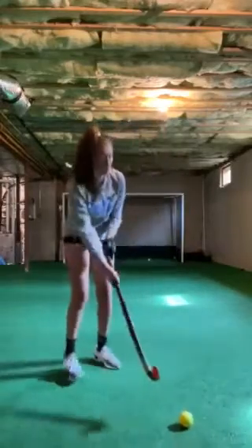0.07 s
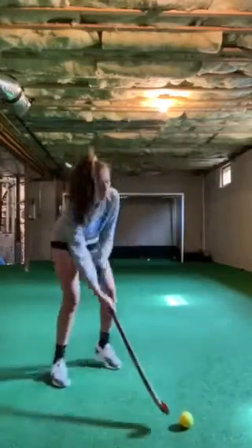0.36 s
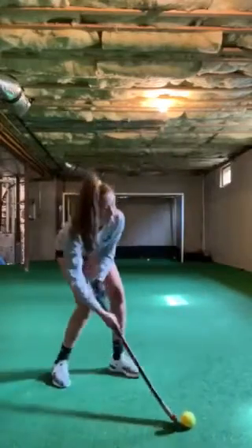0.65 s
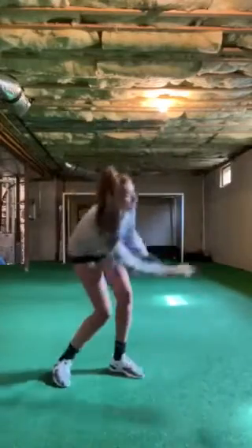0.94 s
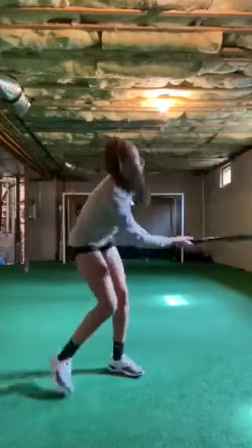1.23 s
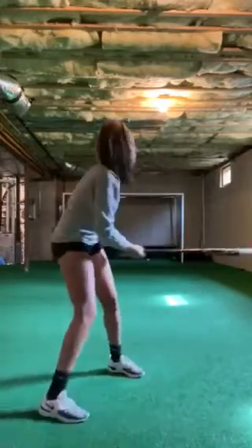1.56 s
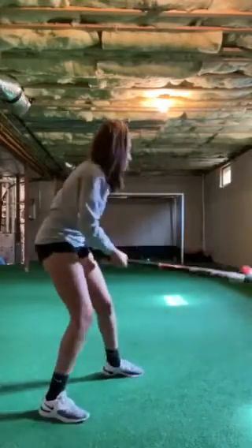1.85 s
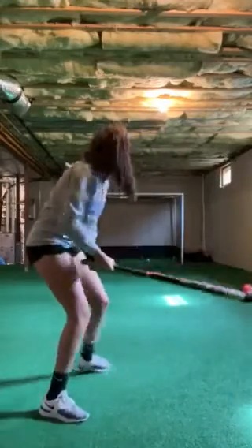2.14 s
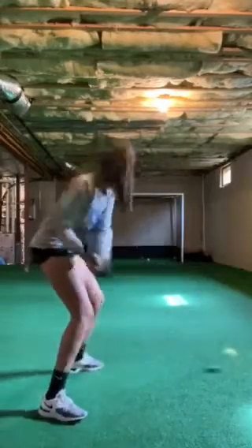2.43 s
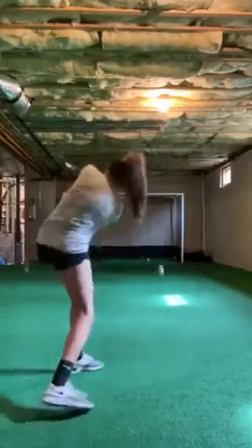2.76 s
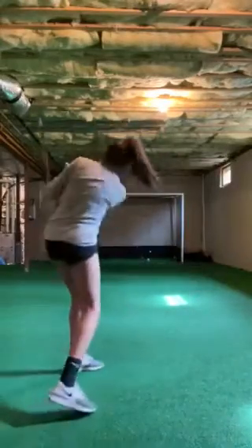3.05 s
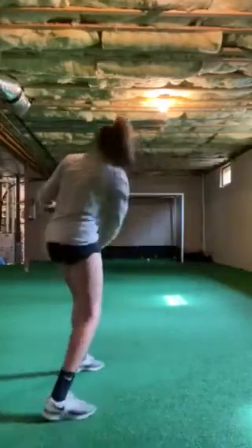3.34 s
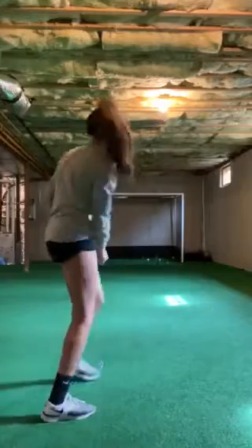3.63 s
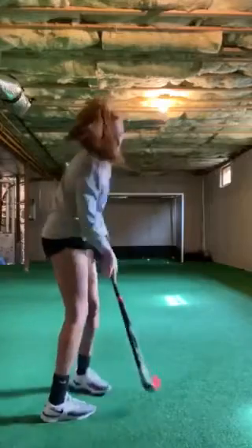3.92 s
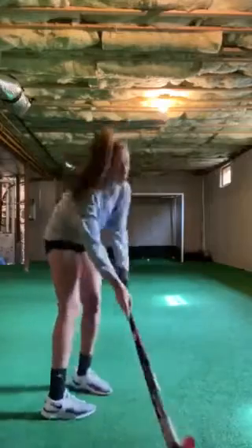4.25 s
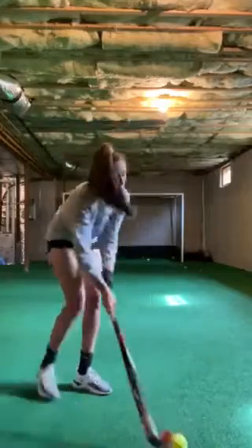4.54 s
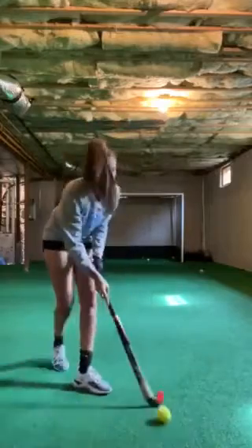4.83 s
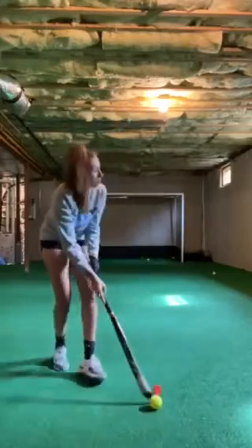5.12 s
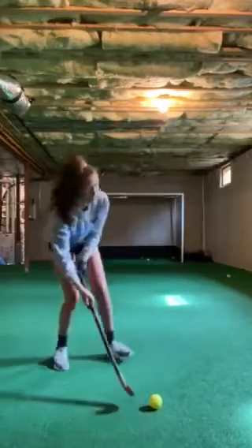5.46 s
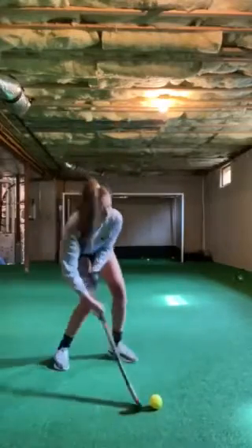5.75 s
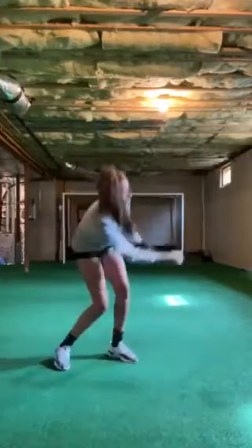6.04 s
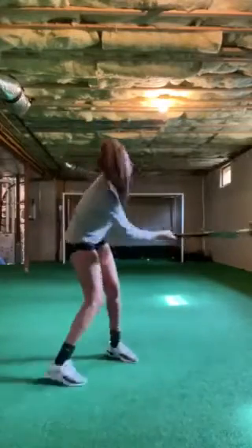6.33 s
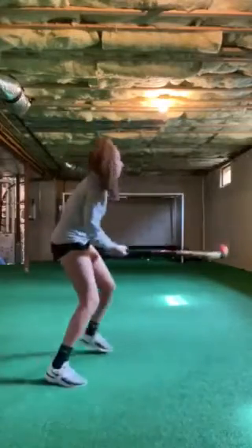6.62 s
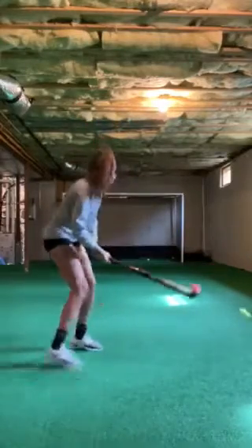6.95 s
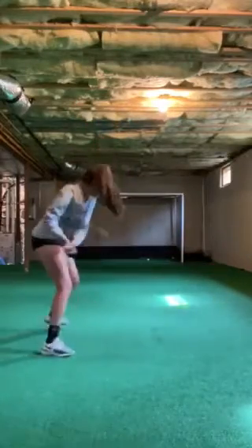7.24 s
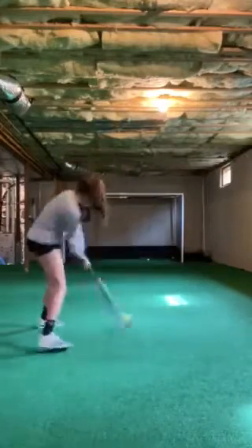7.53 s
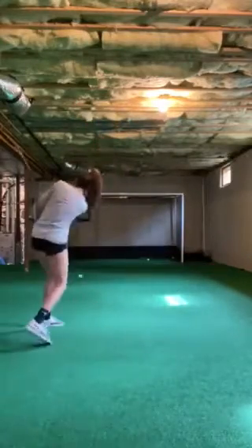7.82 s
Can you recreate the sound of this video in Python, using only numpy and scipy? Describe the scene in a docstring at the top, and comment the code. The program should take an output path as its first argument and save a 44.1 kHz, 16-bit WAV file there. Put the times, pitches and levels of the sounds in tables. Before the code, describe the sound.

Light knocks of a stick on a ball and dull bounces on turf are followed by a hard crack and, a moment later, a hollow boom from a backboard. Four more taps, two soft bounces and another sharp shot follow. Each knock flutters between the walls of a low basement, heard from near the player, over faint shuffling and a steady low building rumble.

```python
"""A soft shuffle and a light tap of stick on ball open field hockey practice in a long, low basement.
Twice the player nudges the ball, knocks it up, lets it thud on the artificial turf and drives it away
with a crack; the first shot booms on the goal's backboard. Every knock flutters between the end walls,
over faint scuffs, rustling clothes and a low rumble. A limiter turns the sound down after the loudest
blows and lets it creep back."""
import sys
import numpy as np
from scipy import signal
from scipy.fft import rfft, irfft, next_fast_len
from scipy.io import wavfile
from scipy.ndimage import uniform_filter1d, minimum_filter1d

SR = 44100
rng = np.random.default_rng(int(sys.argv[2]) if len(sys.argv) > 2 else 0)


def unload_audio(sound):
    """Save the sound as a 16-bit wav file, at the path given as the first command line argument."""
    columns = np.transpose(np.atleast_2d(sound))
    # keep every value between -1 and 1, then stretch to whole-number steps
    steps = np.round(np.clip(columns, -1, 1) * 32767)
    wavfile.write(sys.argv[1], SR, steps.astype(np.int16))


N = 347508
SIZE = 3 * 2 ** 14  # samples in one knock or one room response
AGE, TIME = np.arange(SIZE) / SR, np.arange(N) / SR  # seconds into a knock, and into the scene
FADE = np.minimum((AGE[-1] - AGE) / .2, 1)  # fades out a knock's last 0.2 s

# Below, tilt brightens a sound, pan is left minus right, and a fade time is the time to drop 60 dB.
# Full shots: (time [s], level [dB], tilt [dB/octave], stick ring [dB], ball ring [dB], shaft [dB],
# echo [dB], flutter [dB], room [dB], knock pitch [Hz], its boost [dB], echo delay [s], pan [dB],
# noise burst [s])
SHOT_HITS = [(2.5510, 6.5, -.55, -12, -2, -21, -13, -20.5, -2.6, 1290, 3, .059, 6.5, .009),
             (7.4792, -5.3, .1, -9, -17, -5.5, -6.5, -16.5, 3.8, 1940, 4, .048, 2.5, .005)]
# The ball hitting the backboard: (time [s], level [dB], room [dB], echo delay [s], pan [dB])
GOAL_HIT = (3.1372, -4.6, 2.2, .069, 1.5)
# Light blows: (time [s], level [dB], tilt [dB/octave], stick ring [dB], pan [dB], room [dB], echo [dB],
# noise burst [s], low knock [Hz], its boost [dB], high knock [Hz], its boost [dB])
TAP_HITS = [(0.6420, -40, -1.5, -15, 3, 1.5, -9, .003, 850, 4, 1230, 2),
            (4.3312, -30.5, -.6, 2, 5, -1, -6, .003, 1325, 3, 2650, 3),
            (4.8820, -33, -1.1, -12, 3.5, 1, -7, .003, 1030, 3, 1380, 4),
            (5.7315, -32.3, .7, -11, 1.5, 2.5, -13, .005, 1000, 7, 1980, 7)]  # on the resting ball
LIFT_HITS = [(1.3060, -26.5, -.55, -18, 2, 2.2, -8, 0, 1130, 4, 1600, 3),
             (6.2863, -27.6, .3, -18, 2, 2.2, -5.5, 0, 1200, 4, 1720, 4)]  # under the ball in the air
# Ball or stick landing on the turf: (time [s], level [dB], tilt [dB/octave], treble cutoff [Hz])
LANDINGS = [(0.493, -56, 0, 1500), (1.7716, -34, .5, 9000), (2.2925, -42, -1.5, 1400),
            (6.7970, -41.5, .7, 9000), (7.2985, -47, -1.5, 1400)]
# The player's movements: (middle time [s], half length [s], level [dB])
SCUFF_MOVES = [(1.07, .05, -75), (1.63, .08, -67), (1.95, .04, -70), (2.10, .06, -59), (2.33, .09, -72),
               (3.85, .03, -77), (4.16, .13, -75), (4.76, .07, -71), (5.02, .1, -72), (5.41, .04, -76),
               (6.06, .04, -76), (6.965, .04, -60.5), (7.17, .05, -75)]  # shoes scuffing, sleeves brushing
SHUFFLE_MOVES = [(0.30, .25, -66), (4.21, .13, -60.5)]  # soft, dull shuffling while lining up

# How much bass and treble each sound has: (frequency [Hz], level [dB])
SHOT_TONE = [(40, -11), (120, -10), (230, -15), (380, -12), (650, -12.5), (900, -11), (1250, -2),
             (2000, -2), (2700, -5), (3400, -4.5), (4300, -10), (5400, -8.5), (7000, -11.5), (8500, -18),
             (10500, -31), (12500, -25), (16000, -52)]
BOARD_TONE = [(30, 1), (60, -8), (120, -9), (190, 2), (400, 1.5), (680, 0), (1000, -5.5), (1400, -12),
              (2300, -9.5), (4000, -15), (7000, -21.5), (10500, -41), (13000, -42), (16000, -60)]
TAP_TONE = [(60, -32), (200, -19), (420, -7), (650, -4), (950, 0), (1700, -7), (2700, -12), (5000, -21),
            (6800, -27), (8300, -23), (10500, -40), (13000, -34), (16000, -48)]
LIFT_TONE = [(60, -30), (200, -13), (450, -11), (750, -5), (1000, -1), (1550, -1.5), (2150, -15),
             (2800, -11), (3600, -12), (8300, -13), (10500, -31), (12500, -26), (16000, -50)]
BOUNCE_TONE = [(40, -19), (130, -2), (220, -1), (480, 1.5), (750, -6), (1200, -11), (2100, -19),
               (3300, -29), (4400, -29), (8000, -43), (16000, -54)]
ECHO_TONE = [(50, -18), (110, -4), (200, 1), (400, -1), (800, -1), (2000, -1.5), (5000, -3.5),
             (13000, -4.5)]  # the room's sound against the direct sound
RUMBLE_TONE = [(25, -28), (40, -13), (60, -3), (105, 0), (145, -9), (236, -5), (384, -18), (650, -26),
               (1000, -28.5), (1440, -31), (2760, -43), (4500, -50), (7500, -55), (10400, -66),
               (13200, -61), (16000, -72)]
# The notes (modes) each object rings at when struck: (pitch [Hz], level [dB], fade time [s])
STICK_MODES = [(415, -19, .06), (490, -17, .04), (815, -9, .07), (975, -16, .045), (1320, 0, .05),
               (1820, -16, .035), (1935, -8, .05), (2100, -18, .04), (2400, -19, .03), (2660, -13, .035),
               (3320, -17, .03), (5430, -27, .015)]
SHAFT_MODES = [(150, -10, .06), (395, 0, .06), (625, -1, .05), (970, 0, .05)]
BALL_MODES = [(3350, -6, .012), (4950, -6, .012), (5430, 0, .014), (6000, -3, .008), (7010, -2, .009)]
BOARD_MODES = [(45, -11, .07), (175, -12, .09), (195, -3, .09), (223, 0, .08), (275, -3.5, .06),
               (411, -6, .07), (490, -11, .06), (628, -10, .09), (678, -43, 1.7), (2320, -41, .45),
               (2490, -38, .55), (3520, -44, .7)]
# How long sound lingers in the room: (frequency [Hz], fade time [s])
ROOM_FADES = [(100, .58), (250, .62), (600, .75), (1400, .92), (3000, .91), (6000, .67), (13000, .44)]


def shots():
    """Hard blows: the stick rings, the shaft thwacks, the ball snaps; brief noise thickens each crack."""
    out = np.zeros((2, N))
    for (s, db, tilt_db, stick_db, ball_db, shaft_db, echo_db, flutter_db, room_db,
         knock_hz, knock_db, echo_s, pan_db, burst_s) in SHOT_HITS:
        knocks = [(1940, 3), (knock_hz, knock_db)]
        crack = click(SHOT_TONE, tilt_db, knocks) + amp(stick_db) * ring(STICK_MODES, tilt_db, knocks)
        place = dict(echo_s=echo_s, pan_db=pan_db, burst_s=burst_s)
        walls = dict(echo_db=echo_db, echo_hz=7000, slap_s=.009,
                     flutter_db=flutter_db, flutter_hz=3000, loss_db=-2.8)
        add(out, s, basement(amp(db) * crack, room_db, near_db=0, near_s=.011, **place, **walls))
        add(out, s, basement(amp(db + shaft_db) * ring(SHAFT_MODES), room_db=-10, **place))
        add(out, s, basement(amp(db + ball_db) * ring(BALL_MODES), room_db=-18, near_db=-9, **place))
    return out


def goal():
    """The ball slams into the backboard, which rattles and booms while the frame rings on faintly."""
    out = np.zeros((2, N))
    s, db, room_db, echo_s, pan_db = GOAL_HIT
    walls = dict(echo_s=echo_s, pan_db=pan_db, echo_db=-11, slap_s=.02,
                 flutter_db=-17, loss_db=-9, trip_s=.076)
    slam = amp(db) * click(BOARD_TONE)
    add(out, s, basement(slam, room_db, burst_s=.005, near_s=.022, **walls))
    boom = amp(db + 2.5) * ring(BOARD_MODES)
    add(out, s, basement(boom, room_db=3, near_db=-7, **walls))
    return out


def stick_taps(hits, tone, echo_s):
    """Light blows: the blade knocks at two pitches set by the spot struck; the stick rings briefly."""
    out = np.zeros((2, N))
    for (s, db, tilt_db, ring_db, pan_db, room_db, echo_db, burst_s,
         low_hz, low_db, high_hz, high_db) in hits:
        knocks = [(low_hz, low_db), (high_hz, high_db)]
        knock = click(tone, tilt_db, knocks) + amp(ring_db) * ring(STICK_MODES, tilt_db, knocks)
        walls = dict(echo_db=echo_db, flutter_db=echo_db - 6.5, flutter_s=.011, flutter_hz=2000)
        add(out, s, basement(amp(db) * knock, room_db, echo_s, pan_db, burst_s, **walls))
    return out


def bounces():
    """The turf cushions each landing to a dull thud."""
    out = np.zeros((2, N))
    for s, db, tilt_db, cutoff_hz in LANDINGS:
        cushion = signal.butter(4, cutoff_hz, fs=SR, output="sos")
        thud = amp(db) * signal.sosfilt(cushion, click(BOUNCE_TONE, tilt_db))
        add(out, s, basement(thud, room_db=-1, echo_s=.058, pan_db=1.5,
                             near_db=2, near_s=.018, echo_db=-14, flutter_db=-19))
    return out


def click(tone, tilt_db=0, knocks=(), size=4096, spread_s=.0008, ripple_db=1.8, ripple_hz=110):
    """The pulse of one contact: a harder touch is brighter, and each spot has its own small peaks."""
    hz = np.fft.rfftfreq(size, 1 / SR)
    ripple = np.interp(hz / ripple_hz, np.arange(size), rng.standard_normal(size))
    db = read(tone, hz) + ripple_db * ripple * np.minimum(hz / 800, 1)
    db += tilt_db * np.log2(np.maximum(hz, 100)) + spot_boost(hz, knocks)
    # pack the energy at the start of the pulse, keeping its tone (minimum phase)
    cepstrum = irfft(np.log(amp(db)))
    cepstrum[1:size // 2] *= 2
    cepstrum[size // 2 + 1:] = 0
    # bending waves carry the treble first: 1 kHz comes spread_s late
    bending = 4j * np.pi * spread_s * np.sqrt(1000 * hz)
    pulse = irfft(np.exp(rfft(cepstrum) - bending))
    window = np.minimum(np.arange(size) / 10, 1) * np.linspace(1, 0, size)
    return np.pad(normalize(pulse * window), (0, SIZE - size))


def ring(modes, tilt_db=0, knocks=()):
    """One blow starts several fading notes; neighbours swing in opposite directions."""
    out = 0
    for k, (hz, db, fade_s) in enumerate(modes):
        strength = amp(db + tilt_db * np.log2(hz) + spot_boost(hz, knocks))
        envelope = strength * amp(-60 * AGE / fade_s)
        out += (-1) ** k * envelope * np.sin(2 * np.pi * hz * AGE)
    return normalize(out * FADE)


def spot_boost(hz, knocks, width_octaves=.15):
    """The struck spot of the blade favours some pitches, given as knocks: (pitch [Hz], boost [dB])."""
    hz = np.maximum(hz, 1)
    return sum(db * np.exp(-(np.log2(hz / pitch) / width_octaves) ** 2) for pitch, db in knocks)


def direct_sound(burst_s, lag_s=.00008, size=1024):
    """A blow, heard first on the left and thickened by a short burst of noise."""
    gate = np.clip((burst_s - AGE[:size]) * SR, 0, 1)
    burst = irfft(stereo_spectrum(size, 2500)[1]) * gate
    blow = burst * amp(8) / np.sqrt(1 + burst_s * SR)
    blow[0, 0] += 1
    blow[1, int(lag_s * SR)] += 1
    blow /= np.linalg.norm(blow, axis=1, keepdims=True)
    return np.pad(blow, ((0, 0), (0, SIZE - size)))


def basement(knock, room_db, echo_s, pan_db, burst_s=0, near_db=-2, near_s=.012,
             echo_db=-8, echo_hz=5000, slap_s=.013,
             flutter_db=-14.5, flutter_hz=2400, flutter_s=.013, loss_db=-5.5, trip_s=.0745):
    """A knock arrives directly, then off floor and beams, then back and forth between the end walls."""
    hz, spectrum = stereo_spectrum(SIZE)
    direct = direct_sound(burst_s)
    nearby = amp(near_db) * irfft(stereo_spectrum(SIZE, 800)[1]) * scatter(.002, near_s, .001)
    slap = amp(echo_db) * scatter(echo_s, slap_s, .0005) * irfft(spectrum / np.hypot(1, hz / echo_hz))
    # the cluttered end walls dull the flutter and leave each round trip weaker and more smeared
    trips = 0
    for k in range(1, 5):
        smear = scatter(echo_s + k * trip_s, k * flutter_s, k ** 2 * .0008)
        trips += amp(flutter_db + (k - 1) * loss_db) * smear
    flutter = trips * irfft(spectrum / np.hypot(1, hz / flutter_hz))
    far = amp(-5.9) * room_tail() + slap + flutter
    far = irfft(rfft(far * FADE) * amp(room_db + read(ECHO_TONE, hz)))
    response = (direct + nearby) * pan(pan_db) + far * FADE
    return signal.fftconvolve(knock[None], response, axes=1)


def scatter(delay_s, decay_s, rise_s):
    """The rise and fall of a bunch of reflections that starts after a delay."""
    age = np.maximum(AGE - delay_s, 0)
    shape = np.exp(-age / decay_s) * (1 - np.exp(-age / rise_s))
    return shape / np.linalg.norm(shape)


def room_tail(build_s=.03):
    """Countless echoes blur into a wash in which each frequency band fades at its own rate."""
    hz, spectrum = stereo_spectrum(SIZE)
    centres, fades = np.transpose(ROOM_FADES)
    tail = 0
    for share, fade_s in zip(np.eye(len(centres)), fades):
        band = irfft(spectrum * read(np.c_[centres, share], hz))
        tail += band * amp(-60 * AGE / fade_s)
    return tail * (1 - np.exp(-AGE / build_s)) / np.sqrt(SR / 20)


def player():
    """Shoes and cloth brush; before each shot the sleeves rustle and the stick rushes through the air."""
    grain = amp(3 * wander(per_s=200))
    brush = noise([(200, -12), (1200, 0), (3000, -4), (7000, -7), (10500, -16), (13000, -12),
                   (16000, -27)])
    whoosh = noise([(30, -6), (110, 0), (400, -8), (1200, -20), (4000, -40), (12000, -55)])
    shuffle = noise([(300, -12), (800, -3), (1430, 0), (2000, -2), (3200, -15), (3600, -6),
                     (4000, -17), (5500, -23), (14000, -36)])
    windups = swells([(s - .05, .12, -67) for s, *_ in SHOT_HITS])
    swings = swells([(s - .003, .028, -45) for s, *_ in SHOT_HITS])
    rustle = amp(-88 + 4 * wander(per_s=7))  # clothes never fall quite still
    rubbing = brush * (swells(SCUFF_MOVES) + windups + rustle) + shuffle * swells(SHUFFLE_MOVES)
    return grain * rubbing + whoosh * swings


def rumble(level_db=-54, pan_db=1.2):
    """The building's steady low rumble."""
    return noise(RUMBLE_TONE) * amp(level_db) * pan(pan_db)


def swells(moves):
    """A smooth rise and fall for each movement: (middle time [s], half length [s], level [dB])."""
    return sum(amp(db) * np.exp(-2 * ((TIME - s) / half_s) ** 2) for s, half_s, db in moves)


def wander(per_s):
    """A random value that glides to a new place per_s times a second."""
    values = rng.standard_normal(4096)
    return np.interp(TIME * per_s, np.arange(len(values)), values)


def noise(tone):
    """Steady stereo noise of strength 1, shaped by a tone: (frequency [Hz], level [dB])."""
    hz, spectrum = stereo_spectrum(next_fast_len(N, True))
    x = irfft(spectrum * amp(read(tone, hz)))[:, :N]
    return x / x.std()


def stereo_spectrum(size, wide_hz=1100):
    """Frequencies and spectra of noise at two close spots: alike in the bass, unrelated in the treble."""
    hz = np.fft.rfftfreq(size, 1 / SR)
    mid, side = rfft(rng.standard_normal((2, size)))
    width = np.clip(hz / wide_hz, .16, 1)
    return hz, (mid + np.array([[1], [-1]]) * width * side) / np.sqrt(1 + width ** 2)


def amp(db):
    """Turn decibels into a multiplier."""
    return 10 ** (np.asarray(db) / 20)


def pan(db):
    """Left and right multipliers, with the left db louder."""
    return amp([[db / 2], [-db / 2]])


def read(table, hz):
    """A table's value at hz, with octaves evenly spaced between its rows."""
    frequencies, values = np.transpose(table)
    return np.interp(np.log(np.maximum(hz, 1)), np.log(frequencies), values)


def normalize(x):
    """Scale a knock to the energy of a fiftieth of a second at full level."""
    return x / np.sqrt(np.sum(x ** 2) / (SR / 50))


def add(out, s, x):
    """Mix a stereo sound in at time s."""
    start = int(s * SR)
    out[:, start:start + x.shape[1]] += x[:, :N - start]


def scene():
    """Everything that sounds in the basement."""
    taps = stick_taps(TAP_HITS, TAP_TONE, echo_s=.059)
    lifts = stick_taps(LIFT_HITS, LIFT_TONE, echo_s=.0505)
    return taps + lifts + bounces() + shots() + goal() + player() + rumble()


def recover(duck_db, db_per_s):
    """A dip in volume that sets in at once and lets go at a steady rate."""
    return np.maximum.accumulate(duck_db + db_per_s * TIME) - db_per_s * TIME


def record(dry, limit_db=-9.3, attack_s=.002, hold_s=1.55, max_held_db=8.5, top_hz=16100):
    """A limiter turns loud blows down and recovers fast, then slowly; peaks are rounded, the top cut."""
    window, hold = int(attack_s * SR), int(hold_s * SR)
    # the limiter reacts less to bass, so a boom passes where a crack is held down
    sensed = signal.sosfilt(signal.butter(1, 320, "highpass", fs=SR, output="sos"), dry)
    power = uniform_filter1d(np.max(sensed ** 2, axis=0), window)
    over_db = np.maximum(10 * np.log10(np.abs(power) + 1e-12) - limit_db, 0)
    # part of the dip stays for hold_s before the volume creeps back
    capped_db = np.minimum(over_db, max_held_db)
    held_db = -minimum_filter1d(-capped_db, hold, mode="constant", origin=(hold - 1) // 2)
    duck_db = np.maximum(recover(over_db, db_per_s=62), recover(held_db, db_per_s=4.4))
    limited = dry * amp(-uniform_filter1d(duck_db, window))
    treble_cut = signal.ellip(8, .2, 70, top_hz, fs=SR, output="sos")
    return signal.sosfilt(treble_cut, np.tanh(limited))


dry = scene()
out = record(dry)
unload_audio(out)
```